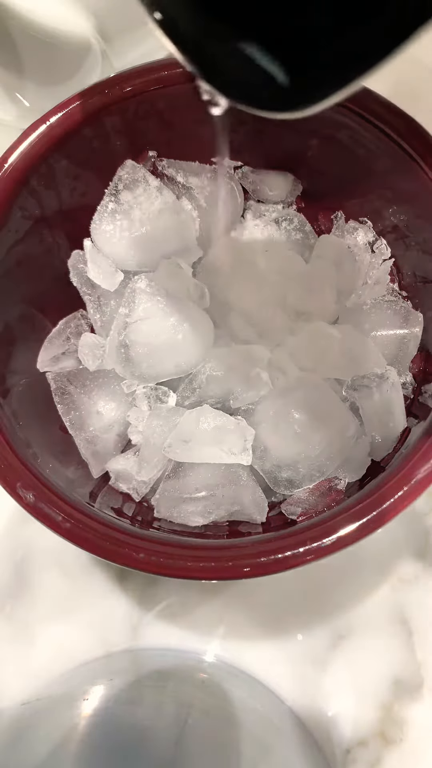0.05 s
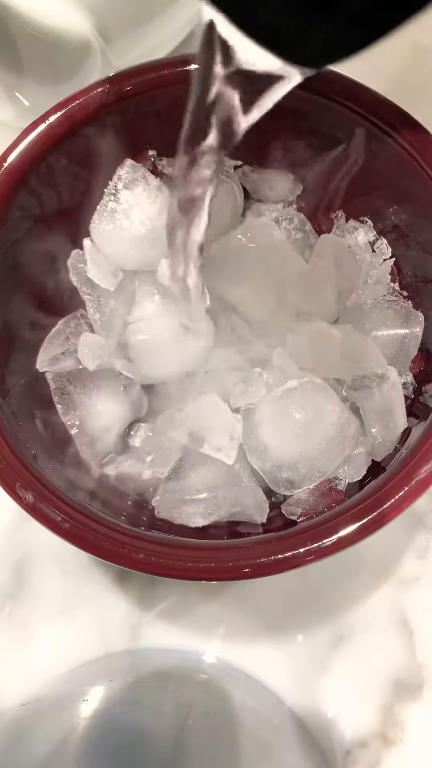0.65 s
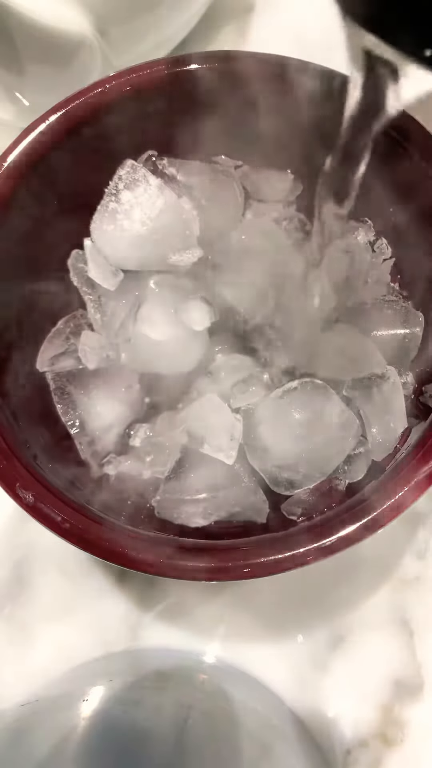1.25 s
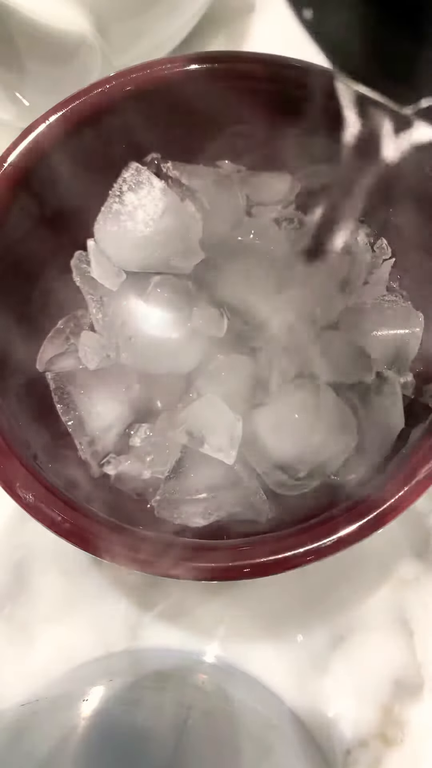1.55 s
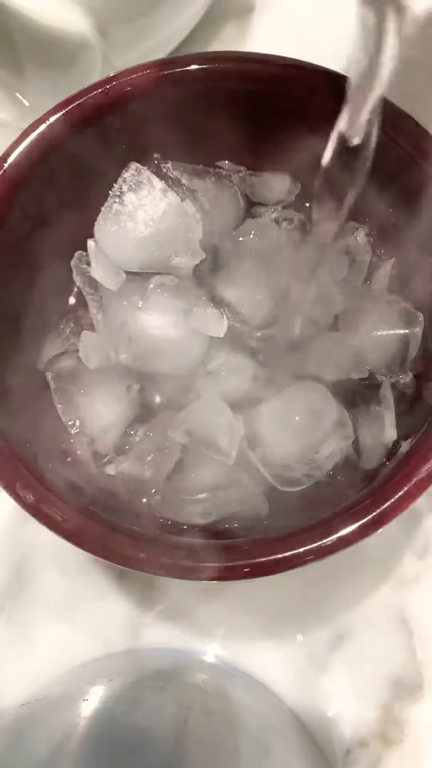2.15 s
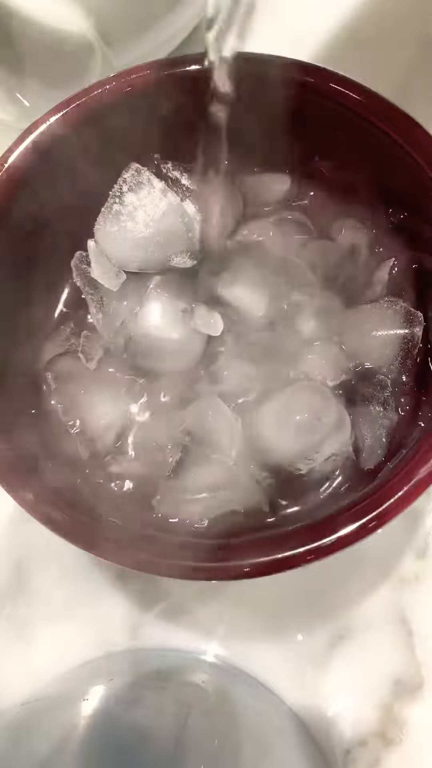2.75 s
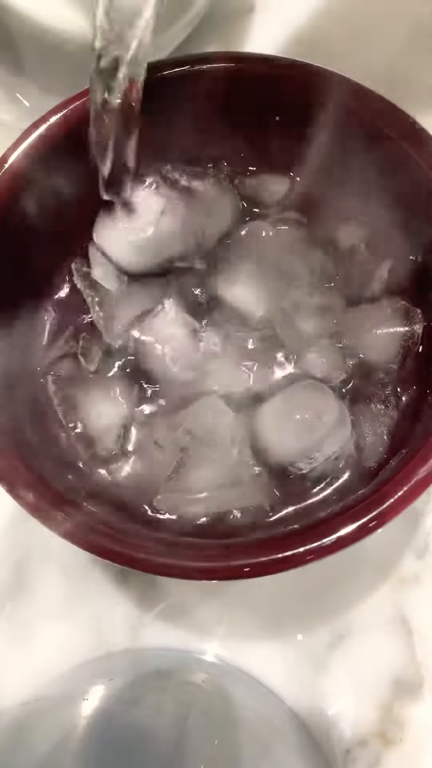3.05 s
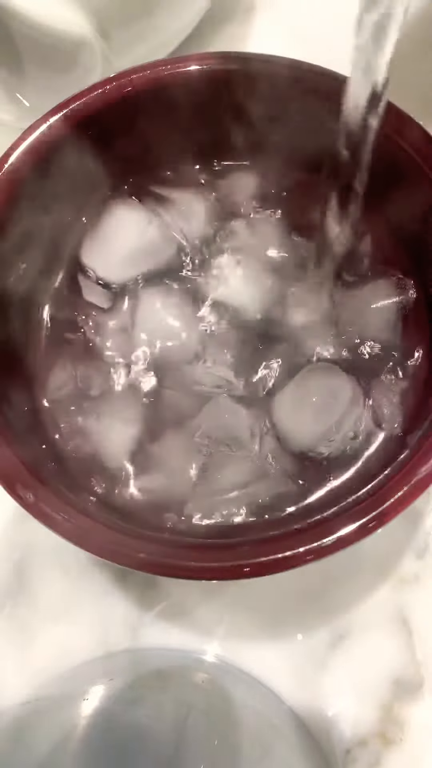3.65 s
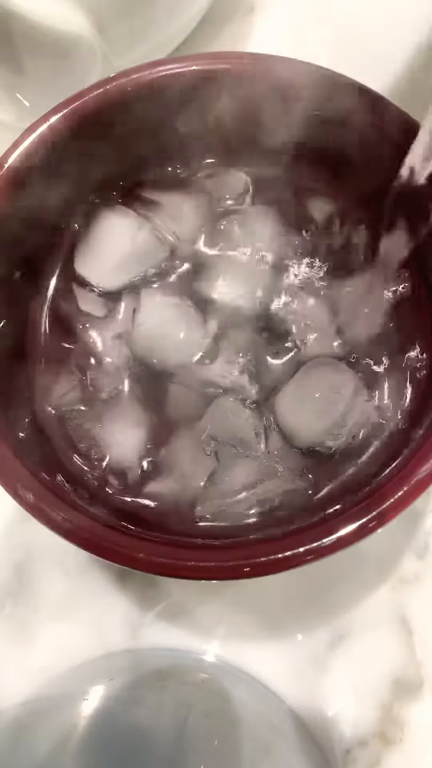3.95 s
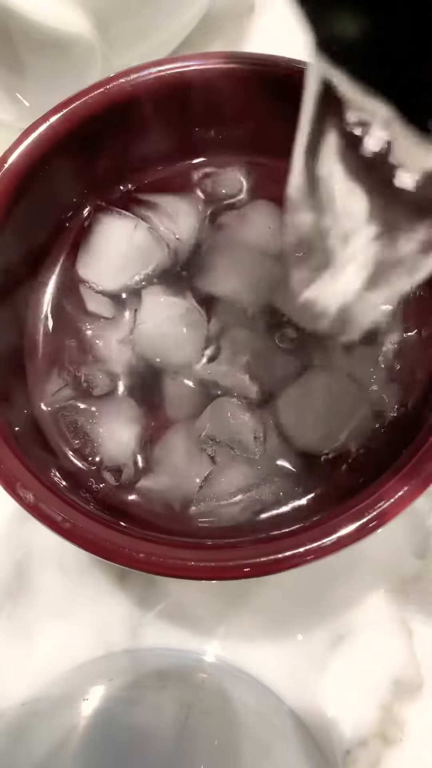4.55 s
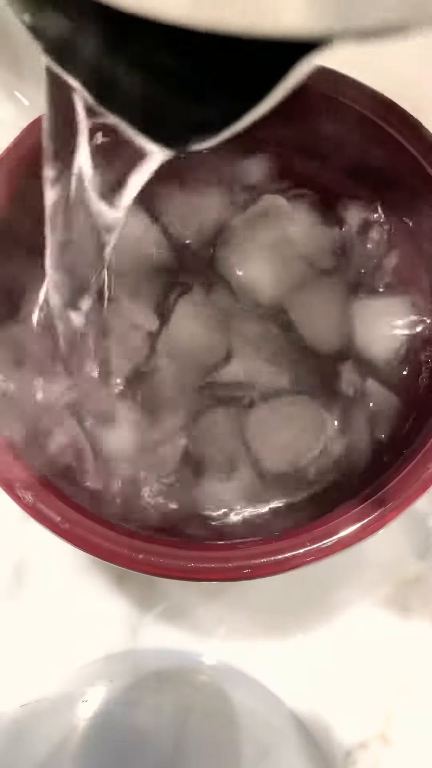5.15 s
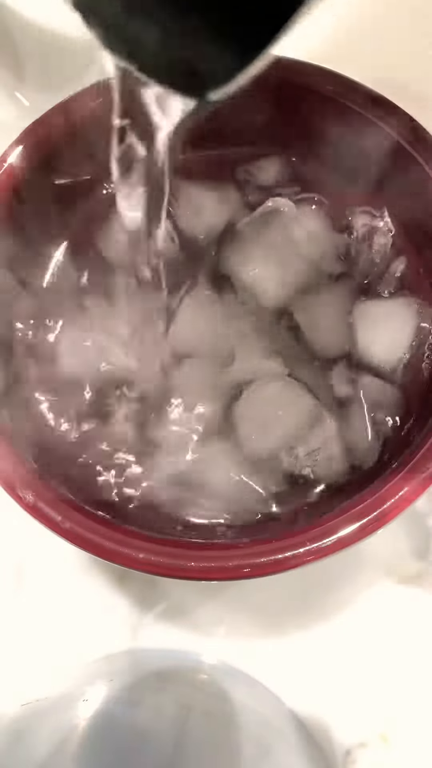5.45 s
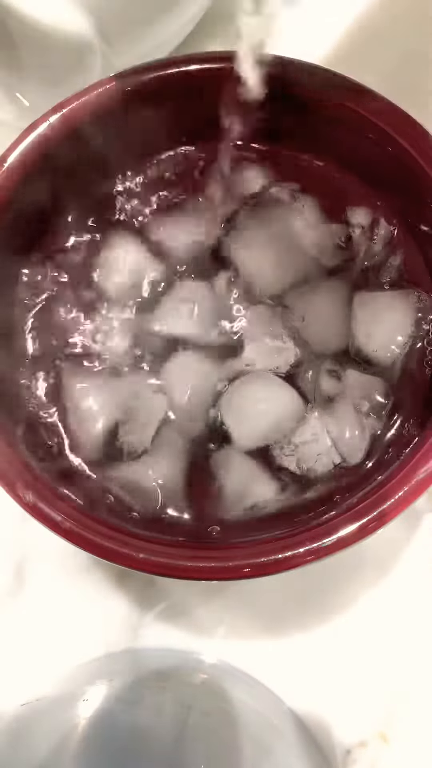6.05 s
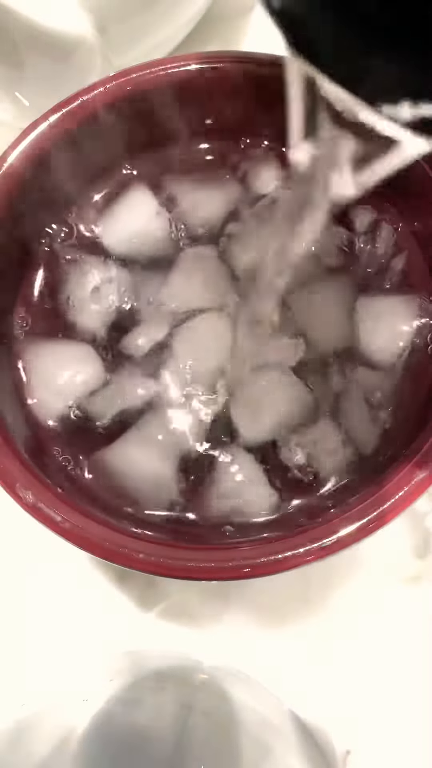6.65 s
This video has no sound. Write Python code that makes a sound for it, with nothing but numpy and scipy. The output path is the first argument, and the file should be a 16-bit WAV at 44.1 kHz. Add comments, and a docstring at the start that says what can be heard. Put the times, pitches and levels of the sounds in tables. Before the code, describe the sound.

Ice cracks sharply and fizzes under a close stream of hot water, which bubbles and plops as the bowl fills.

```python
"""Sharp cracks, a fine crackle and gurgling water: hot water runs from a kettle onto ice cubes
in a ceramic bowl on a kitchen counter. The sudden heat splits the ice, and each split is a tiny snap.
The stream spatters on the cubes and drags in air, which rings as bubbles that gurgle and plop.
Loosened cubes knock together with a glassy ring. The bowl colours all of these sounds,
the kitchen adds a short echo, and an appliance hums in the room."""
import sys
import numpy as np
from scipy import signal
from scipy.fft import rfft, irfft
from scipy.io import wavfile
from scipy.ndimage import uniform_filter1d

SR = 44100
rng = np.random.default_rng(int(sys.argv[2]) if len(sys.argv) > 2 else 0)


def wav_out(sig):
    """Save sig, one row per channel (or a flat mono array), as 16-bit PCM at SR to the path in sys.argv[1]."""
    wavfile.write(sys.argv[1], SR, np.round(np.clip(np.atleast_2d(sig).T, -1, 1) * 32767).astype(np.int16))


N = 299880   # 6.8 seconds

# the steady wash of the stream over the ice: (time [s], spatter level [dB], crackle level [dB])
STREAM_WASH = [(0.0, -86, -65), (0.27, -82, -53), (0.34, -54, -34.5), (0.68, -47.5, -47.5),
               (1.05, -34.5, -45.5), (1.18, -54.5, -48), (1.55, -38.5, -37.5), (1.79, -55, -51),
               (2.02, -49, -44.5), (2.38, -59, -48), (2.52, -51, -42), (3.0, -54, -53.5), (4.1, -47.5, -47),
               (4.42, -54.5, -64), (4.7, -49.5, -49.5), (5.9, -46, -53), (6.8, -58.5, -59)]
# the bright tone of snapping ice: (frequency [Hz], level [dB])
SNAP_TONE = [(300, -42), (1000, 6.5), (2300, -8), (3200, 4), (4500, 12.5), (7000, 15.5), (10000, 7),
             (13000, 11.5), (16000, -24)]
# the tone of the tick that starts a plop, bubble or knock: (frequency [Hz], level [dB])
TICK_TONE = [(200, -16), (700, -6), (1500, 12.5), (3200, 8.5), (6000, 5), (16000, -13.5)]


def from_db(db):
    """Turn decibels into a number to multiply by."""
    return 10 ** (np.asarray(db) / 20)


def at_hz(table, hz):
    """Read a table at the given frequencies, sliding between rows on a log scale."""
    table_hz, values = np.transpose(table)
    return np.interp(np.log(hz + 1), np.log(table_hz), values)


def at_time(table, seconds):
    """Read every column of a table at the given times."""
    times, *columns = np.transpose(table)
    return [np.interp(seconds, times, column) for column in columns]


def random_starts(per_s):
    """Pick the samples at which random events begin."""
    return np.flatnonzero(rng.random(N) < per_s / SR)


def random_strengths(spread_db, cap):
    """One strength for every sample: mostly weak, a few strong."""
    return from_db(spread_db * np.minimum(rng.exponential(1, N), cap))


def colour(x, tone, size=2048):
    """Give a sound a tone with a filter that never rings ahead of a hit (minimum phase)."""
    cepstrum = irfft(np.log(from_db(at_hz(tone, np.fft.rfftfreq(size, 1 / SR)))))
    cepstrum[1:size // 2] *= 2
    cepstrum[size // 2 + 1:] = 0
    response = irfft(np.exp(rfft(cepstrum)))
    return signal.oaconvolve(x, response[None] / np.linalg.norm(response), axes=1)[:, :N]


def place(times, sounds, width):
    """Add up short sounds, each from its own spot in the bowl, as mid and side (stereo sum and gap)."""
    starts = np.round(np.maximum(times, 0) * SR).astype(int)
    samples = (starts[:, None] + np.arange(sounds.shape[1])).ravel()
    spots = rng.standard_normal(4096)[np.arange(len(times)) % 4096, None]
    side_gain = (1 + width * spots) / np.hypot(1, width)
    return np.array([np.bincount(samples, part.ravel(), N)[:N] for part in (sounds, sounds * side_gain)])


def snaps(count, t60, scatter_db, size=1400):
    """Sharp clicks, one a row, whose scatter among the cubes fades by 60 dB in t60 seconds."""
    scatter = rng.standard_normal((count, size)) * from_db(-60 * np.arange(size) / SR / t60)
    scatter *= from_db(scatter_db) / np.linalg.norm(scatter, axis=1, keepdims=True)
    scatter[:, 0] += rng.choice([-1, 1], count)   # the click itself
    return scatter / np.linalg.norm(scatter, axis=1, keepdims=True)


def rings(hz, t60, attack_s, rise_per_s, size=1600):
    """Fading tones, one a row; the pitch can creep up, as a bubble's does near the surface."""
    t = np.arange(size) / SR
    phase = 2 * np.pi * hz[:, None] * t * (1 + rise_per_s * t / 2)
    fade = from_db(-60 * t / np.maximum(t60, .002)[:, None])
    return np.sin(phase) * (1 - np.exp(-t / attack_s)) * fade


def evened(x, span_s):
    """Hold the average level of many tiny sounds steady."""
    size = max(int(span_s * SR), 64)
    power = uniform_filter1d(uniform_filter1d(np.mean(x * x, axis=0), size), size)
    return x / np.sqrt(np.abs(power) + 1e-12)


def swells(starts, lengths, levels_db, attack_s, release_s):
    """The level of a run of surges: each builds up to its start time, holds and dies away."""
    t, power = np.arange(0, N, 20) / SR, 0
    for start, length, db in zip(starts, lengths, levels_db):
        attack = np.clip(1 + (t - start) / attack_s, 0, 1)
        release = np.exp(-np.maximum(t - start - length, 0) / release_s)
        power = power + (from_db(db) * attack * release) ** 2
    return np.interp(np.arange(N) / SR, t, np.sqrt(power))


def room_noise(tone, level_db):
    """Smooth noise that is almost the same in both ears in the bass."""
    # how alike left and right are: (frequency [Hz], likeness [0-1])
    likeness = [(30, 0.98), (130, 0.98), (300, 0.62), (700, 0.0073), (4000, 0.34)]
    hz = np.fft.rfftfreq(N, 1 / SR)
    mid, side = rfft(rng.standard_normal((2, N))) * from_db(at_hz(tone, hz))
    alike = at_hz(likeness, hz)
    noise = irfft(np.sqrt(1 + alike) * mid + np.sqrt(1 - alike) * side * [[1], [-1]], N)
    return from_db(level_db) * noise / np.sqrt(np.mean(noise ** 2))


def background():
    """An appliance's motor hums over the rumble and faint hiss of the room."""
    # the motor's steady tones: (frequency [Hz], level [dB])
    motor_tones = [(40.4, -62.5), (120, -55.5), (240, -66), (300, -70.5), (359, -78)]
    # the room's low rumble and its hiss, each: (frequency [Hz], level [dB])
    rumble_tone = [(12, -33), (20, -3), (43, -1), (85, -7), (124, 0), (182, -12), (298, -12), (327, -20),
                   (364, -18), (438, -24), (655, -19), (800, -25), (1040, -55), (1760, -120)]
    hiss_tone = [(600, -6), (1500, 1), (3000, -11), (8000, -11.5), (15800, -20), (16500, -48)]
    t = np.arange(N) / SR
    hum = sum(np.sqrt(2) * from_db(db) * np.sin(2 * np.pi * (hz * t + rng.random()))
              for hz, db in motor_tones)
    return hum + room_noise(rumble_tone, level_db=-49.5) + room_noise(hiss_tone, level_db=-61)


def kitchen_echo(x, build_s, t60, size=22050):
    """Sound bounces off the counter and nearby surfaces, duller and different on each side."""
    # the tone of the echo: (frequency [Hz], level [dB])
    echo_tone = [(2000, 0), (4200, -9), (5400, -9), (7000, -4), (12000, -15), (15000, -2)]
    t = np.arange(size) / SR
    tail = rng.standard_normal((2, size)) * from_db(-60 * t / t60) * (1 - np.exp(-t / build_s))
    tail = colour(tail / np.linalg.norm(tail, axis=1, keepdims=True), echo_tone)
    return signal.oaconvolve(x[None], tail, axes=1)[:, :N]


def left_and_right(near):
    """Sound reaches two points a few centimetres apart, in step at some pitches and opposed at others."""
    # how far the left side is ahead of the right: (frequency [Hz], phase [radians])
    left_lead = [(20, 0), (1700, .1), (3000, 1.4), (4100, 1.4), (4750, 2.8), (5500, 3.6), (6400, 5.4),
                 (7500, 6.2), (9500, 6.7), (11100, 9.0), (13300, 9.9), (14600, 12.1), (17000, 12.8)]
    phase = at_hz(left_lead, np.fft.rfftfreq(N, 1 / SR))
    mid, side = rfft(near) * [np.cos(phase / 2), 1j * np.sin(phase / 2)] * np.exp(-.5j * phase)
    return irfft([mid + side, mid - side], N)


def bowl_and_microphone(x):
    """The bowl's ring colours the sound, and the microphone adds one narrow dip."""
    # peaks and dips that colour the sound: (frequency [Hz], width [Hz], boost or cut [dB])
    peaks_and_dips = [(848, 345, -9.5), (1044, 167, 12.5), (1337, 274, 4), (1702, 32, 7), (1895, 740, 3),
                      (2580, 32, -26.5), (3025, 270, 4), (4150, 78, 4), (8340, 790, 3.5)]
    for hz, width_hz, db in peaks_and_dips:
        centre = -2 * np.cos(2 * np.pi * hz / SR)
        width, height = np.tan(np.pi * width_hz / SR), from_db(db / 2)
        forward = [1 + width * height, centre, 1 - width * height]
        feedback = [1 + width / height, centre, 1 - width / height]
        x = signal.lfilter(forward, feedback, x)
    return x


def fizz(per_s):
    """Air escapes from the melting ice as very fine ticking."""
    # the thin, high tone of the fizz: (frequency [Hz], level [dB])
    fizz_tone = [(1000, -23), (6000, -10), (10000, -5), (12500, -4), (15700, -2.5), (16400, -36)]
    born = random_starts(per_s)
    strength = random_strengths(spread_db=5.2, cap=4)[born, None]
    ticks = strength * snaps(len(born), t60=.01, scatter_db=2, size=400)
    return colour(evened(place(born / SR, ticks, width=.78), span_s=.12), fizz_tone)


def sputter(per_s, fade_s, steady_share):
    """The stream breaks on the cubes in sudden, uneven spurts; this gives their jumping level."""
    strength = random_strengths(spread_db=3.3, cap=3)
    kicks = (rng.random(N) < per_s / SR) * strength ** 2
    power = signal.lfilter([1], [1, -np.exp(-1 / (fade_s * SR))], kicks)
    return np.sqrt(steady_share + (1 - steady_share) * power / power.mean())


def tiny_hits(spurts, per_s, spread_db, low_hz, high_hz, cycles, smack_db, size=900):
    """Droplets or hairline cracks that come in spurts: each is a smack and a brief ping."""
    born = random_starts(per_s)
    strength = (spurts * random_strengths(spread_db, cap=4))[born, None]
    hz = low_hz * (high_hz / low_hz) ** rng.random(N)[born]
    t60 = cycles / hz * 2 ** rng.uniform(-1, 1, N)[born]   # some stop at once, others tinkle
    ping = rings(hz, t60, attack_s=.0001, rise_per_s=1, size=size)
    ping /= np.linalg.norm(ping, axis=1, keepdims=True)
    smack = from_db(smack_db) * snaps(len(born), t60=.011, scatter_db=2, size=size)
    return evened(place(born / SR, strength * (ping + smack), width=.37), span_s=.08)


def gurgle(spread_octaves, cycles, lowest_hz, tick_db):
    """The stream drags in air; each bubble breaks off with a tick and rings at a pitch set by its size."""
    # the deeper the pool, the fewer its bubbles: (time [s], rate [bubbles per s])
    bubble_rate = [(3.5, 440), (5.5, 290)]
    # the typical note of the trapped air: (time [s], pitch [Hz])
    bubble_pitch = [(0.0, 1200), (0.66, 1524), (0.98, 1293), (1.31, 1540), (2.16, 1330), (2.78, 1307),
                    (2.97, 1645), (3.79, 1280), (4.43, 1730), (4.62, 1316), (5.17, 1676), (5.49, 1260),
                    (6.42, 2010)]
    born = random_starts(at_time(bubble_rate, np.arange(N) / SR)[0])
    times = born / SR
    hz = at_time(bubble_pitch, times)[0] * 2 ** (spread_octaves * rng.standard_normal(N)[born])
    hz = lowest_hz + np.abs(hz - lowest_hz)   # no bubble rings below the lowest pitch; deeper ones fold back above it
    strength = (random_strengths(spread_db=2.5, cap=3) * rng.choice([-1, 1], N))[born, None]
    strength *= (hz / lowest_hz)[:, None] ** .52   # small bubbles ring briefly but brightly
    t60 = cycles / hz * 2 ** rng.uniform(-1, 1, N)[born]   # the cubes stop some sooner than others
    ring = strength * rings(hz, t60, attack_s=.00017, rise_per_s=3.7)
    tick = strength * from_db(tick_db) * snaps(len(born), t60=.01, scatter_db=0)
    bubbles = place(times, ring, width=.88) + colour(place(times, tick, width=.5), TICK_TONE)
    return evened(bubbles, span_s=.16)


def stream_levels(pool_db, spatter_db, crackle_db, freed_air_db):
    """How strong the gurgle, spatter, crackle and fizz are over time: a steady flow plus surges."""
    # steady bubbling in the pool: (time [s], level [dB])
    pool_bubbling = [(0.0, -64), (0.36, -60.5), (0.51, -56), (0.89, -44), (1.21, -50), (1.55, -45),
                     (1.68, -55), (2.46, -47.5), (2.56, -44.5), (3.54, -49.5), (4.0, -43.5), (4.47, -56),
                     (5.42, -45.5), (6.0, -39), (6.14, -46.5), (6.8, -51)]
    # air leaving the melting ice: (time [s], level [dB])
    escaping_air = [(0.0, -93), (0.45, -67), (1.21, -63.5), (1.7, -70), (2.05, -62.5), (3.01, -65),
                    (4.2, -62), (5.19, -68.5), (6.34, -62), (6.8, -63)]
    # the stream finds cold ice and sizzles: (time [s], length [s], crackle [dB], spatter [dB])
    sizzles = [(0.332, 0.081, -48.5, -48.5), (0.474, 0.04, -48, -45.5), (0.549, 0.019, -43.5, -42.5),
               (0.615, 0.02, -51, -47), (1.225, 0.055, -47, -48), (1.367, 0.0078, -43, -40.5),
               (1.602, 0.011, -45.5, -42.5), (1.891, 0.087, -56.5, -52), (2.011, 0.021, -46.5, -48),
               (2.168, 0.043, -45.5, -52.5), (2.226, 0.032, -44, -51.5), (2.438, 0.013, -44, -47),
               (2.798, 0.07, -52, -77), (3.151, 0.086, -47, -52.5), (3.275, 0.048, -44, -51.5),
               (3.661, 0.078, -50.5, -54.5), (4.156, 0.066, -49, -53), (4.688, 0.048, -49.5, -63),
               (5.329, 0.1, -55, -51.5)]
    # the stream plunges into a gap and churns: (time [s], length [s], level [dB])
    plunges = [(0.33, 0.088, -45), (0.446, 0.13, -44), (0.735, 0.043, -40.5), (0.85, 0.3, -46.5),
               (1.252, 0.027, -41.5), (1.363, 0.044, -46.5), (1.495, 0.2, -48.5), (1.88, 0.15, -52),
               (2.439, 0.21, -44), (3.195, 0.17, -48), (3.697, 0.2, -42.5), (4.091, 0.18, -43),
               (4.815, 0.031, -41.5), (5.132, 0.2, -45), (5.43, 0.083, -42), (5.57, 0.14, -50.5),
               (5.857, 0.062, -39.5)]
    t = np.arange(N) / SR
    pool, = from_db(at_time(pool_bubbling, t))
    air, = from_db(at_time(escaping_air, t))
    spatter, crackle = from_db(at_time(STREAM_WASH, t))
    times, lengths, sizzle_db, spray_db = np.transpose(sizzles)
    sizzle, spray = [swells(times, lengths, db, attack_s=.015, release_s=.017)
                     for db in (sizzle_db, spray_db)]
    churn = swells(*np.transpose(plunges), attack_s=.022, release_s=.0097)
    return (np.hypot(from_db(pool_db) * pool, churn),
            np.hypot(from_db(spatter_db) * spatter, spray),
            np.hypot(from_db(crackle_db) * crackle, sizzle),
            np.hypot(air, from_db(freed_air_db) * sizzle))


def pour(gurgle_db, splash_db, crackle_db, fizz_db):
    """The stream makes bubbles, spatters on the ice, puts hairline cracks in its skin and frees air."""
    # the tones of the splashing drops and of the crackling ice, each: (frequency [Hz], level [dB])
    splash_tone = [(150, -8), (400, -1), (700, 4), (1200, -1), (2300, 0), (3100, -4), (4200, -1),
                   (6000, -7), (12000, -24)]
    crackle_tone = [(500, -28), (3000, 10), (5000, 31.5), (7000, 11.5), (9000, 12), (11000, 13),
                    (13500, -1), (15800, -4), (16500, -53)]
    water, spatter, ice, air = stream_levels(
        pool_db=-4.5, spatter_db=-11.5, crackle_db=-11.5, freed_air_db=-11)
    spurts = sputter(per_s=95, fade_s=.003, steady_share=.38)
    bubbles = gurgle(spread_octaves=.37, cycles=19, lowest_hz=1000, tick_db=1)
    drops = tiny_hits(spurts, per_s=950, spread_db=3.2, low_hz=1900, high_hz=4100, cycles=32, smack_db=-3)
    crackle = tiny_hits(spurts, per_s=1400, spread_db=3.6, low_hz=5500, high_hz=11000,
                        cycles=70, smack_db=-1)
    return (from_db(gurgle_db) * water * bubbles
            + from_db(splash_db) * spatter * colour(drops, splash_tone)
            + from_db(crackle_db) * ice * colour(crackle, crackle_tone)
            + from_db(fizz_db) * air * fizz(per_s=900))


def thumps(gain_db):
    """A gulp of water lands deep in the bowl with a dull, hollow splat."""
    # water dropping through the pile: (time [s], level [dB])
    landings = [(0.381, -34.5), (0.89, -36), (1.372, -33), (1.558, -43), (4.883, -39.5)]
    # the dull tone of the splat: (frequency [Hz], level [dB])
    splat_tone = [(100, 3), (350, -9.5), (650, 3.5), (900, 1), (2000, -1.5), (8000, -55)]
    times, level_db = np.transpose(landings)
    splat = from_db(level_db + gain_db)[:, None] * snaps(len(times), t60=.2, scatter_db=4, size=3000)
    return colour(place(times, splat, width=.3), splat_tone)


def knocks(tick_db, cycles):
    """Cube meets cube: a hard tick, then each gives a short glassy ring at its own pitch."""
    # loose cubes bumping: (time [s], level [dB], larger cube [Hz], smaller cube [Hz], tick offset [dB])
    bumps = [(0.719, -17.5, 2160, 4470, -15.5), (1.0668, -27.5, 1370, 2920, -8),
             (1.368, -17, 2000, 2980, -12), (1.4935, -34, 1050, 3460, 3), (1.843, -35.5, 2930, 4040, -15),
             (3.0422, -27, 2280, 2740, -10.5), (3.3317, -28.5, 2420, 2680, -29),
             (4.3645, -23, 2100, 3320, -10.5)]
    times, level_db, large_hz, small_hz, contact_db = np.transpose(bumps)
    both_cubes = sum(rings(hz, cycles / hz, attack_s=.0001, rise_per_s=0) for hz in (large_hz, small_hz))
    ring = from_db(level_db)[:, None] * both_cubes
    tick = from_db(level_db + contact_db + tick_db)[:, None] * snaps(len(times), t60=.035, scatter_db=5)
    return place(times, ring, width=.3) + colour(place(times, tick, width=.2), TICK_TONE)


def plops(ring_db, tick_db):
    """A drip or an air pocket makes a tick and rings for a moment."""
    # single drips and air pockets: (time [s], level [dB], pitch [Hz], tick offset [dB])
    drips = [(0.386, -33, 970, -11.5), (0.466, -21.5, 1430, -29), (0.779, -28, 2040, -19),
             (0.791, -21.5, 1275, -22), (0.864, -27, 1070, -30), (0.883, -25.5, 1010, -18),
             (0.93, -24, 1100, -16), (0.959, -39, 1420, -8), (1.043, -26, 970, -19),
             (1.267, -24, 1410, -14), (1.659, -28, 1210, -15), (1.921, -32.5, 2380, -13.5),
             (2.055, -32.5, 1180, -28), (2.31, -31.5, 1340, -17.5), (2.455, -22.5, 1650, -16),
             (2.565, -22, 1770, -25), (2.876, -36.5, 1110, -12.5), (3.018, -28, 2100, -16),
             (3.214, -29, 1280, -19.5), (3.484, -29, 1240, -24), (3.546, -31.5, 1260, -20),
             (3.689, -25, 1590, -19), (3.853, -22.5, 1130, -22), (4.037, -25.5, 1350, -26),
             (4.088, -28, 1760, -36), (4.111, -27.5, 1744, -33), (4.245, -25.5, 1090, -18),
             (4.516, -40.5, 1860, -4.5), (4.545, -36, 1860, -12), (4.809, -15.5, 1180, -25.5),
             (4.876, -28, 1870, -36), (4.977, -39.5, 2040, -4), (5.123, -21.5, 1370, -24.5),
             (5.279, -27.5, 1670, -18), (5.417, -21.5, 1370, -18), (5.439, -25, 1140, -36),
             (5.601, -32.5, 1150, -16), (5.791, -32, 1100, -31), (5.814, -26, 1240, -28),
             (5.852, -13, 1430, -28.5), (5.864, -19, 1360, -29), (5.888, -22, 1950, -17),
             (5.915, -29, 1420, -25), (5.928, -24.5, 1430, -22), (5.944, -28, 1440, -18),
             (5.953, -24, 1780, -20), (5.978, -22.5, 1980, -40), (5.987, -24, 1560, -15),
             (6.016, -22, 1950, -20), (6.022, -15.5, 1830, -25), (6.043, -25, 2130, -24),
             (6.12, -28, 2160, -41), (6.127, -29, 2170, -29), (6.144, -35, 1710, -12),
             (6.213, -31, 1990, -17), (6.414, -30, 2300, -18.5), (6.449, -34.5, 2900, -18),
             (6.463, -27.5, 2260, -28), (6.493, -35, 2325, -29), (6.722, -36, 1910, -29)]
    times, level_db, hz, contact_db = np.transpose(drips)
    ring = rings(hz, t60=np.full(len(times), .011), attack_s=.00084, rise_per_s=.9)
    ring *= from_db(level_db + ring_db)[:, None]
    tick = snaps(len(times), t60=.018, scatter_db=1.5)
    tick *= from_db(level_db + contact_db + tick_db)[:, None]
    return place(times, ring, width=.24) + colour(place(times, tick, width=.15), TICK_TONE)


def small_cracks(per_s, gain_db, spread_db):
    """Stray little splits all over the pile, louder and softer with the steady crackle."""
    born = random_starts(per_s)
    _, crackle_db = at_time(STREAM_WASH, born / SR)
    level_db = gain_db + crackle_db + spread_db * rng.random(N)[born]
    splits = from_db(level_db)[:, None] * snaps(len(born), t60=.02, scatter_db=0)
    return colour(place(born / SR, splits, width=.55), SNAP_TONE)


def cracks(snap_db, thud_db, splinter_db, travel_s=.0006):
    """Sudden heat splits a cube: a bright snap, a lower thud from the cube, and brittle splinters."""
    # the ice splitting: (time [s], level [dB], thud offset [dB], splinter offset [dB])
    splits = [(0.4063, -24.5, -12, -25), (0.4803, -32, -19, -20), (0.49, -18.5, -24, -28),
              (0.496, -26, -12, -25), (0.542, -15, -4, -12), (0.5483, -17.5, -1, -10),
              (0.552, -12.5, -13, -16), (0.5762, -26, -5, -19), (0.629, -31, -7, -3), (0.649, -19, -5, -4),
              (0.7125, -23, 1, -24), (0.7442, -28, 7, -17), (0.8402, -25.5, 2.5, -22), (0.9277, -30, 9, -6),
              (1.139, -17.5, -32, 2.5), (1.2494, -13.5, -33, 7), (1.273, -29, 1, -17),
              (1.4084, -23.5, 0.5, 12.5), (1.4935, -12.5, -12, -4), (1.5625, -8.5, -8, -7),
              (1.5812, -23, -17, -8), (1.6022, -24, -19, -10), (1.7093, -12, -3, -1),
              (1.827, -29.5, -25, 7), (1.8447, -38, -16, -14), (2.1707, -28, -25, -21),
              (2.232, -22, -22, -26), (2.2667, -39, -9, -22), (2.323, -32.5, -4, -20),
              (2.4427, -23, -14, -8), (2.5635, -17, -20, 3), (2.8006, -30.5, -11, -21),
              (2.864, -33, -14, -12), (2.8968, -30, -10, -18), (2.984, -29.5, 1, -22),
              (3.1584, -33, -17, -15), (3.1847, -27.5, -18, -18), (3.192, -22, -24, -31),
              (3.2337, -27, -9, -18), (3.274, -26, -29, -23), (3.3035, -21.5, -17, -20),
              (3.359, -28, -18, -46), (3.3712, -33, -15, -19), (3.6427, -34, -18, -17),
              (3.668, -11, -5.5, -7), (3.743, -26.5, -26, -23), (3.886, -9, -9, -8),
              (4.071, -29.5, -29, -12), (4.153, -21.5, -9, -27), (4.165, -26, -14, -23), (4.583, -40, 9, 7),
              (4.7107, -30, -34, -19), (4.721, -24, -12, -13), (4.7781, -27, -3, -23),
              (5.164, -35.5, 5.5, 6), (5.3284, -27, 1.5, -26), (5.3928, -37, -7, 5),
              (5.4063, -25.5, -15, -22), (5.5115, -32, -5, -18), (5.5965, -26.5, -12, -2),
              (5.9876, -42, 7, 0)]
    # the tones of the cube's thud and of its splinters, each: (frequency [Hz], level [dB])
    thud_tone = [(200, 7), (700, -22), (1100, -2.5), (2000, 13.5), (3100, 6.5), (4500, -13), (16000, -36)]
    splinter_tone = [(1000, -60), (6000, -4), (10000, -1.5), (13000, 1.5), (15700, 4), (16500, -4)]
    times, level_db, low_db, top_db = np.transpose(splits)
    snap = from_db(level_db)[:, None] * snaps(len(times), t60=.010, scatter_db=-.7)
    thud = from_db(level_db + low_db)[:, None] * snaps(len(times), t60=.012, scatter_db=-2)
    splinter = from_db(level_db + top_db)[:, None] * snaps(len(times), t60=.008, scatter_db=0)
    parts = [(snap_db, snap, SNAP_TONE), (thud_db, thud, thud_tone),
             (splinter_db, splinter, splinter_tone)]
    return sum(from_db(db) * colour(place(times + travel_s, sounds, width=.29), tone)
               for db, sounds, tone in parts)


def scene():
    """The bowl is close by; the kitchen adds a little echo and a steady hum."""
    room = background()
    hits = (cracks(snap_db=13, thud_db=7, splinter_db=16) + plops(ring_db=3, tick_db=26.5)
            + knocks(tick_db=24.5, cycles=21.6) + thumps(gain_db=23))
    stream = pour(gurgle_db=-5, splash_db=-2.5, crackle_db=4.5, fizz_db=9.5)
    near = bowl_and_microphone(hits + stream + small_cracks(per_s=24, gain_db=19.5, spread_db=7))
    echo = from_db(-19.5) * kitchen_echo(near[0], build_s=.0073, t60=.048)
    return (left_and_right(near) + echo + room) * from_db([[0], [.7]])   # the right is a touch louder


def record(dry):
    """Clip the peaks of the loudest cracks and cut the very highest treble."""
    peak_limit, cutoff_hz = .9, 16600
    treble_cut = signal.ellip(10, .1, 80, cutoff_hz, fs=SR, output="sos")
    return signal.sosfilt(treble_cut, np.clip(dry, -peak_limit, peak_limit))


dry = scene()
out = record(dry)
wav_out(out)
```